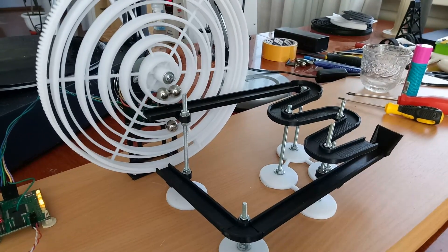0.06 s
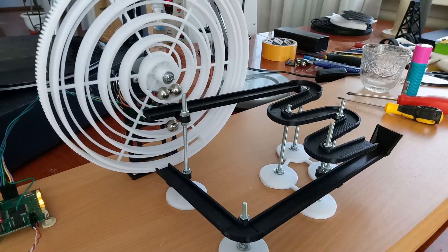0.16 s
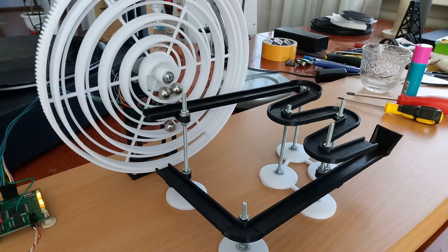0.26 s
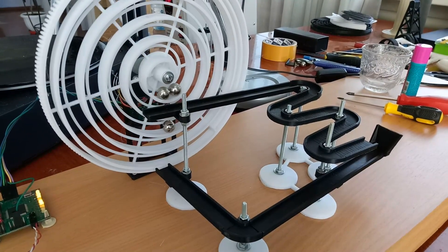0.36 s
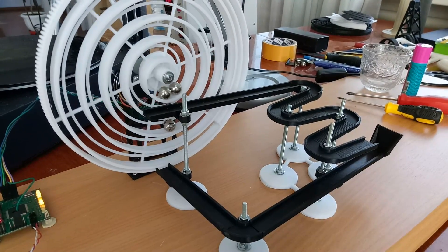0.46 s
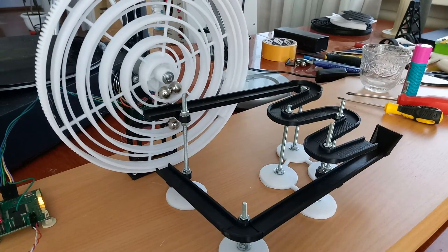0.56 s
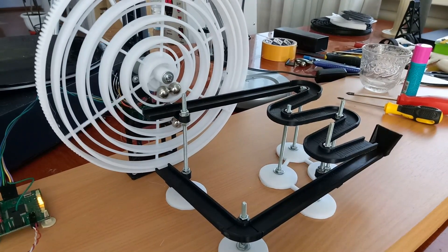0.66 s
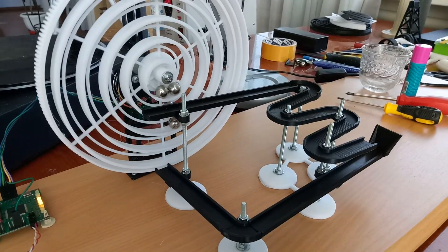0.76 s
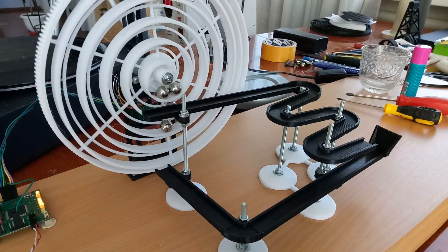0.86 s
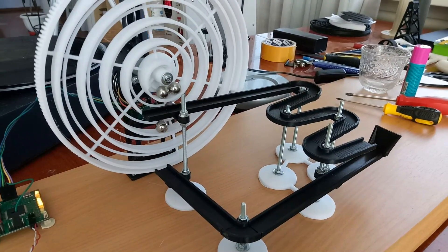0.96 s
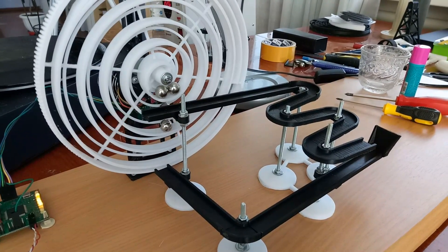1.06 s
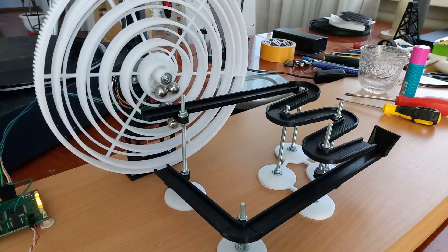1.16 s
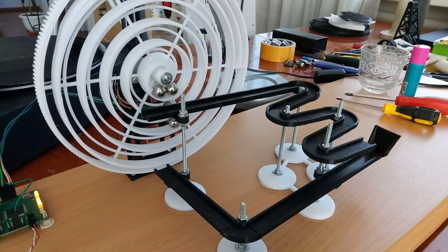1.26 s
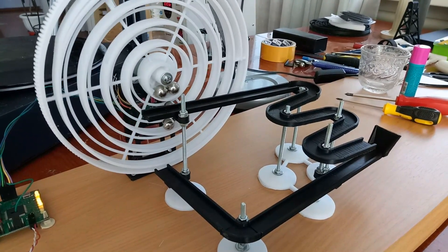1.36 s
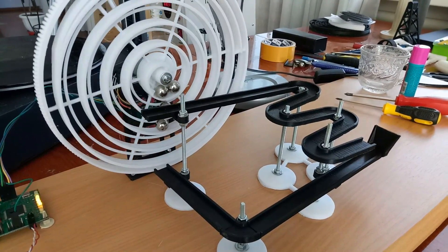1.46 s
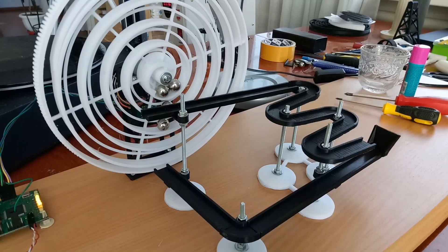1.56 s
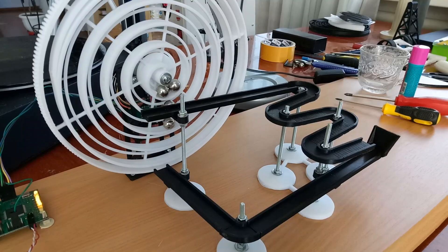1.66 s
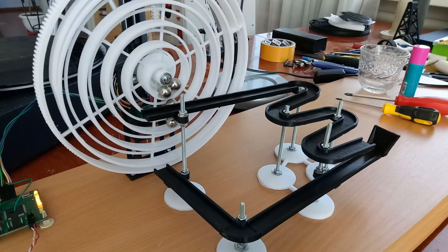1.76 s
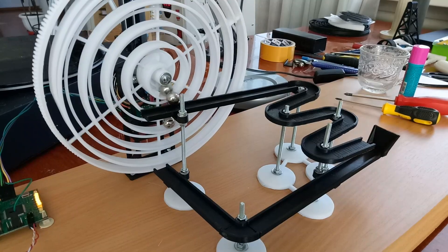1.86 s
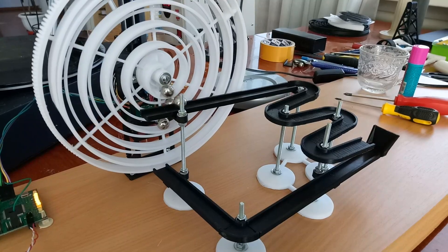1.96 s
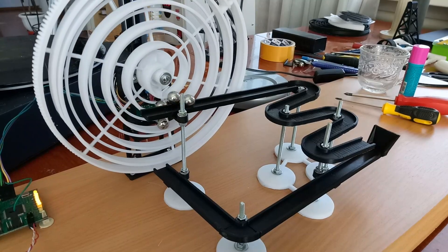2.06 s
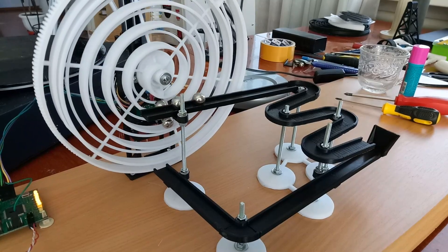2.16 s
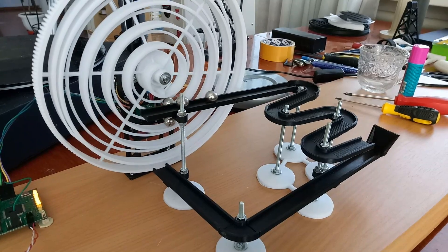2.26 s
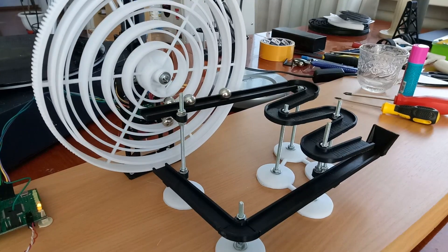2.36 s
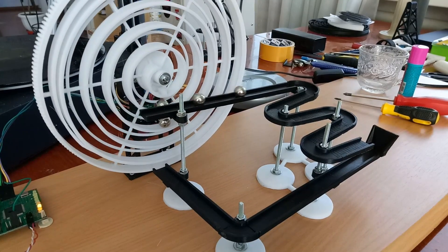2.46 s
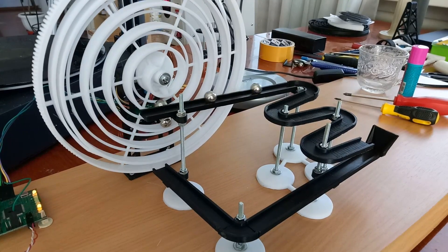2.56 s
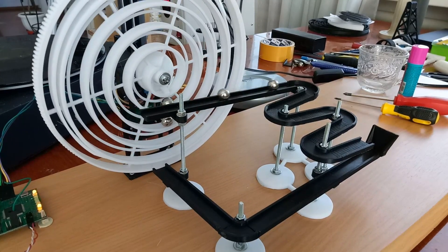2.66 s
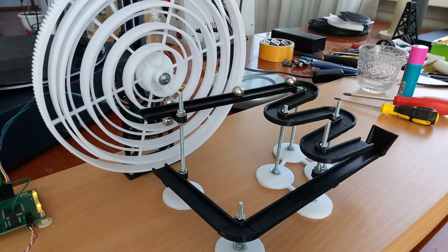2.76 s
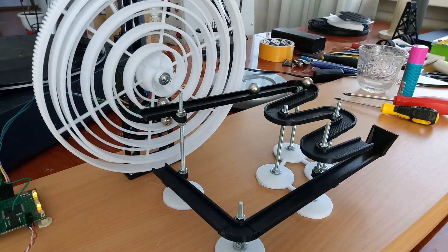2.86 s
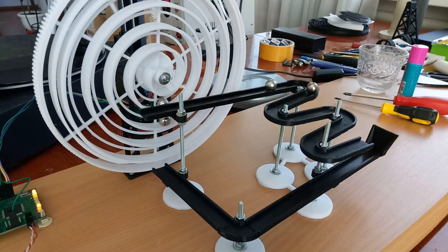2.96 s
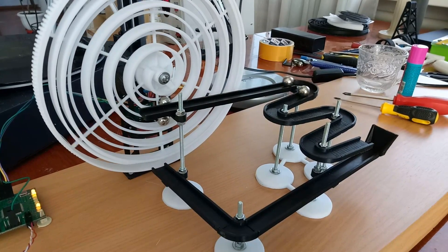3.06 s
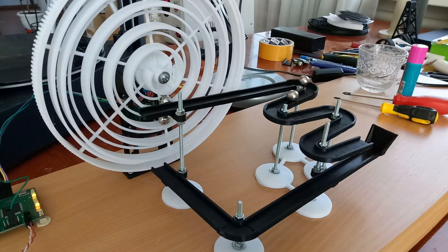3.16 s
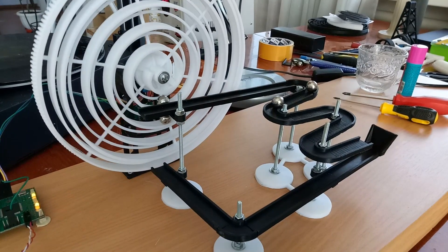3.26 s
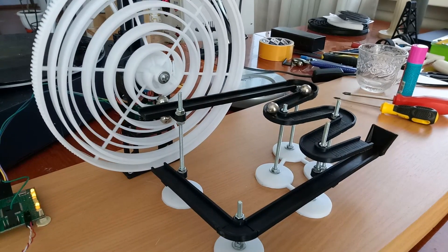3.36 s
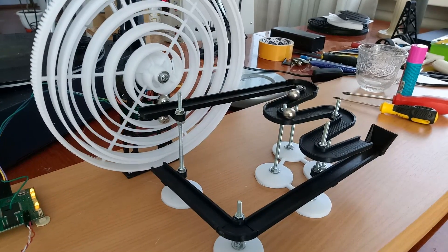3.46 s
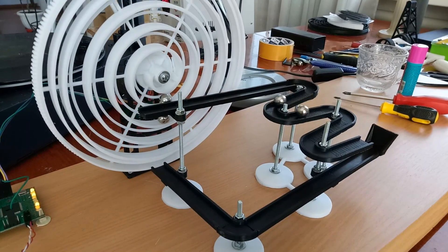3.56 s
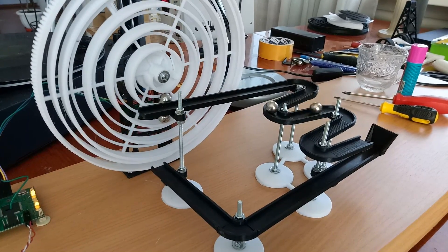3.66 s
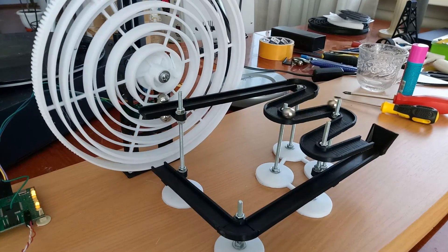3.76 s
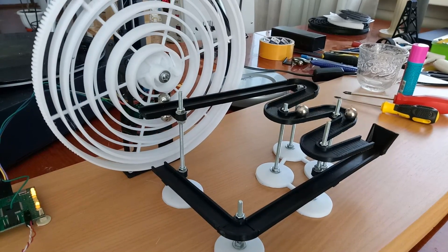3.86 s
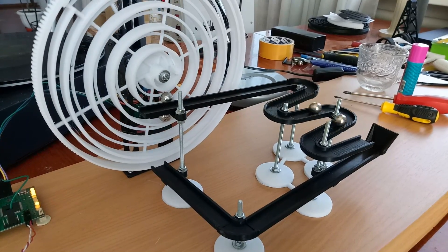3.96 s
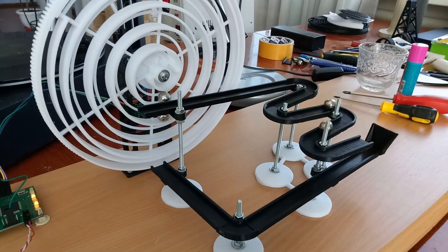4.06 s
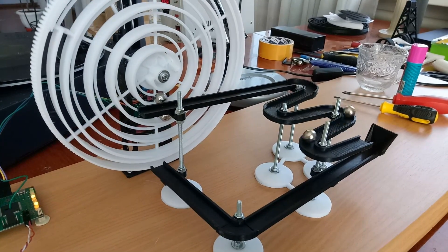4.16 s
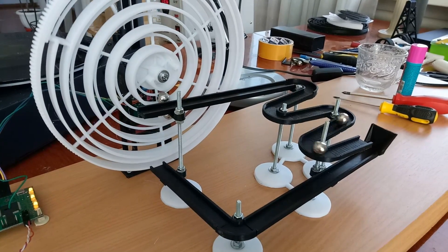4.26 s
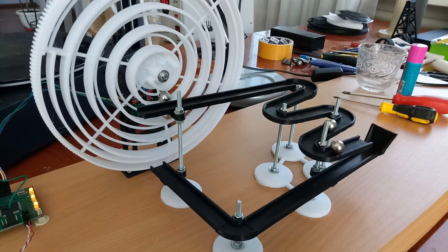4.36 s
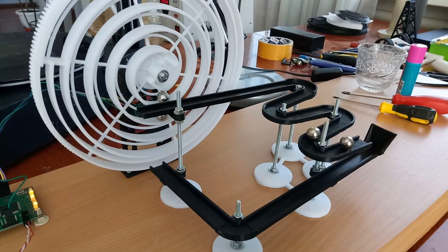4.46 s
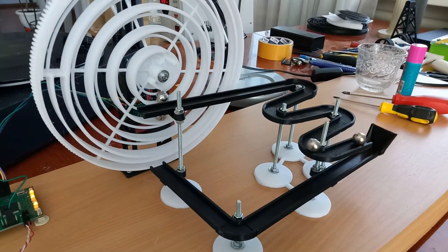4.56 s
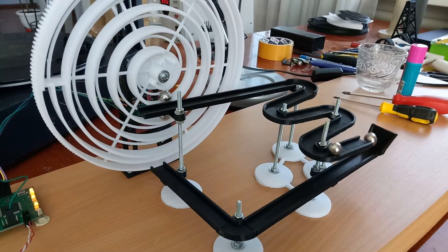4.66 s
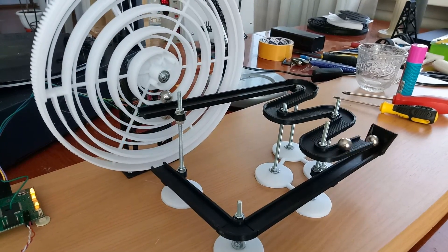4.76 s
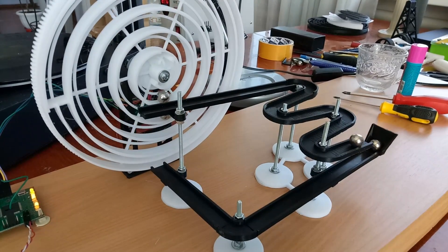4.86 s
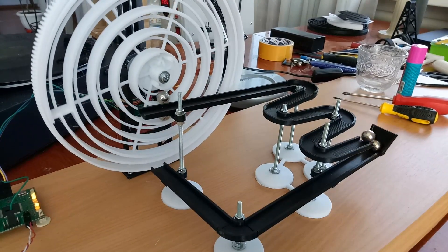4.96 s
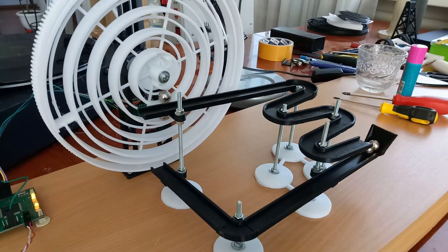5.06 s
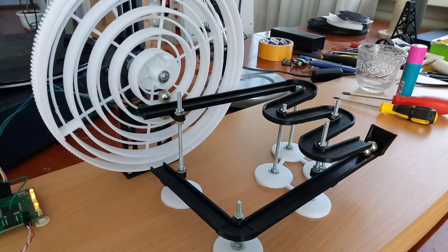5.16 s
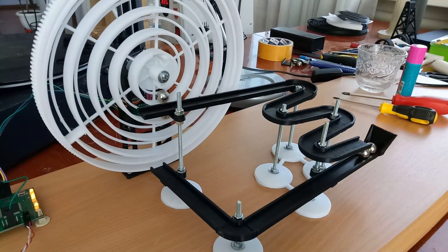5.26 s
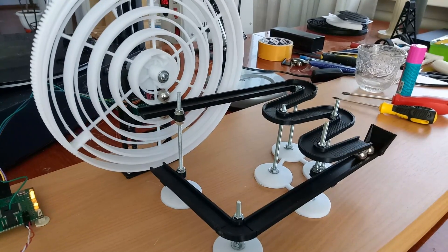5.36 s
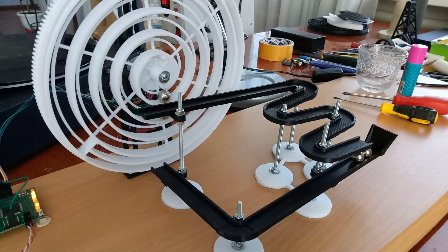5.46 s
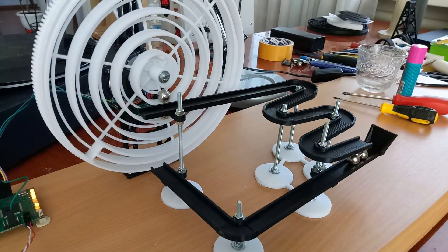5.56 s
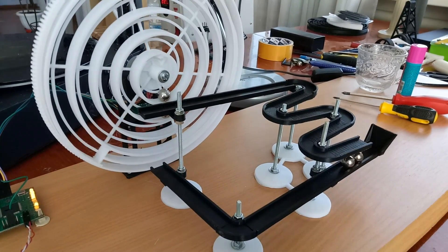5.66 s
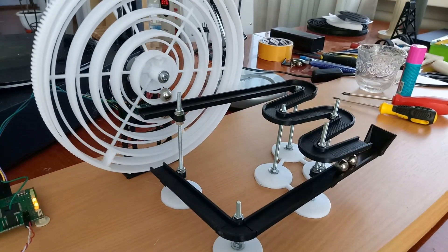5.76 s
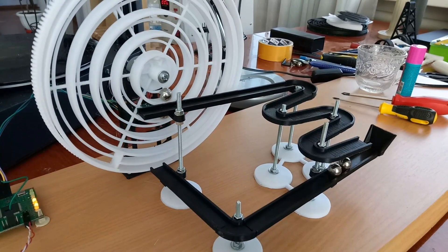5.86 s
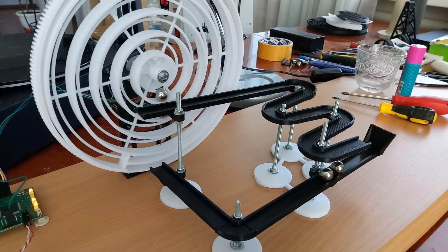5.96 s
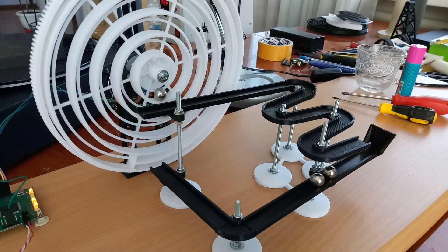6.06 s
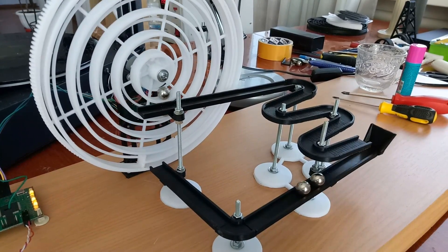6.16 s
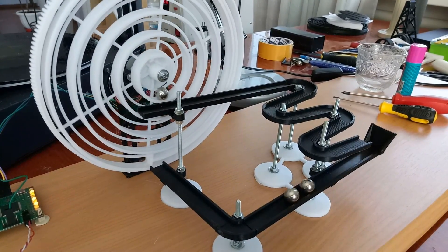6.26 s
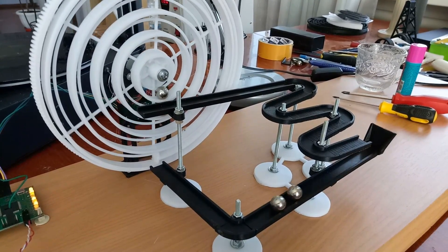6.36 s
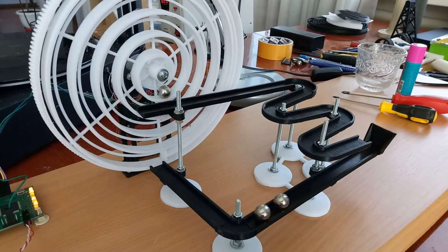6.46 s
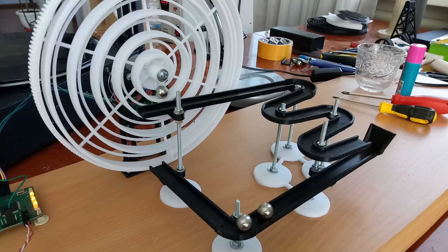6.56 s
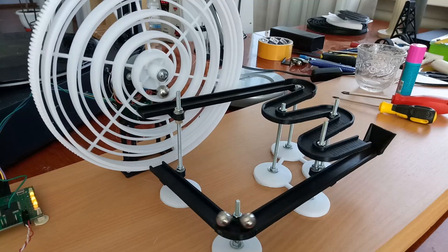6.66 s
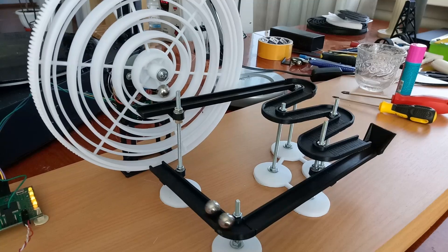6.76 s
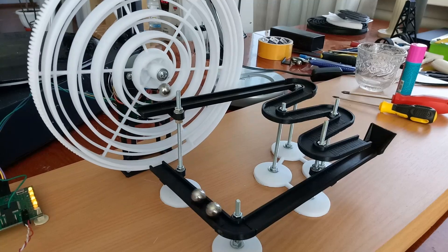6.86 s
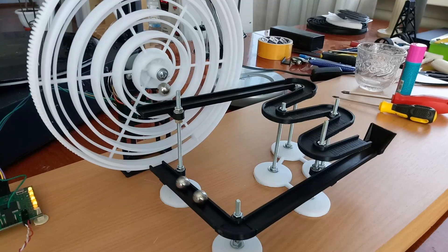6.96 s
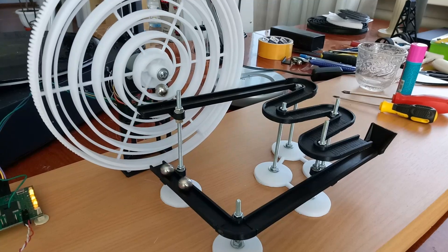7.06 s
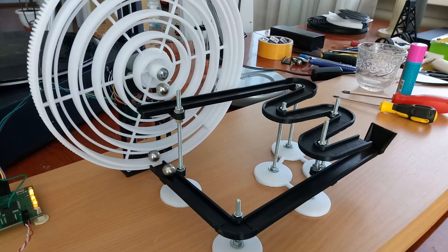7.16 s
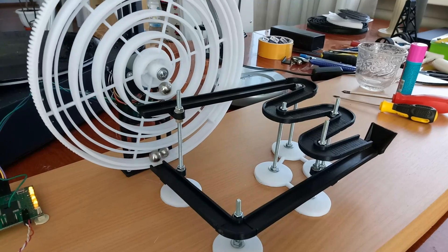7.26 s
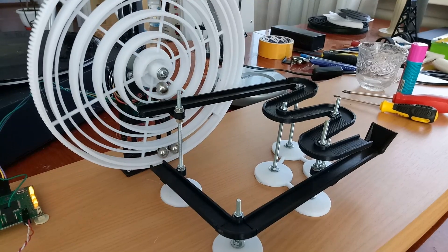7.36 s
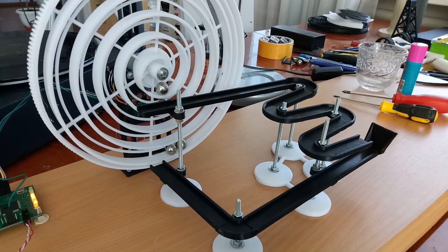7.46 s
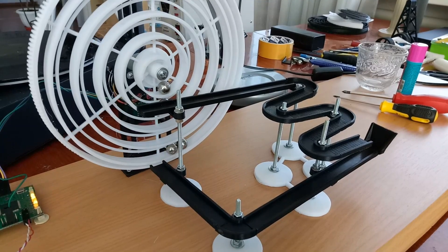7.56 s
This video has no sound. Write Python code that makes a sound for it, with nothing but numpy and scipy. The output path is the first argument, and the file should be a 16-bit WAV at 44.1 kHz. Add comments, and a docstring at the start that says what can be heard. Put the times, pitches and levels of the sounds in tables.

```python
"""A gear rubs, knocks and squeaks over a motor's whine and hiss: a small marble machine on a desk.
Its wheel lifts two steel balls and tips them onto a plastic zigzag track. They bounce, rattle down the bends,
drop one after the other into a cup, and roll down a long ramp back to the wheel, where they click together.
Blows and rolling are scattered or random force ringing a plastic part, split into four registers from desk
thump to tick; motor and hiss are shaped noise, and a low tone that swells now and then is a wavering sine."""
import sys
import numpy as np
from scipy import signal
from scipy.fft import rfft, irfft, next_fast_len
from scipy.io import wavfile
from scipy.ndimage import uniform_filter1d

SR = 44100
rng = np.random.default_rng(int(sys.argv[2]) if len(sys.argv) > 2 else 0)


def persist_wave(psi):
    """Save psi, clipped to +-1, as 16-bit WAV."""
    counts = np.round(np.clip(psi, -1, 1) * 32767).astype(np.int16)
    wavfile.write(sys.argv[1], SR, np.atleast_2d(counts).T)


N = 335160  # 7.6 s
TIME = np.arange(N) / SR

# In all tables, spectra are: pitch_hz, level_db, and resonances: pitch_hz, width_hz, height_db.
# Blows are: start_s, clack_db, weight_db (extra thump and knock). Rolling is: time_s, clack_db.
# Each surface's level_db offset comes on top of these clack levels.
# Colours have rows for thump, knock and tick: level_db against the clack at usual strength,
# growth (dB gained per dB of clack).

# The four registers of a contact, in the order clack, thump, knock, tick:
# low_hz, high_hz, build_up_s, die_away s (time constants, which blows scale for each surface)
REGISTERS = [(1043, 3170, 0.0078, 0.013), (25, 397, 0.039, 0.12), (473, 763, 0.036, 0.012),
             (2590, 17000, 0.000065, 0.0087)]


def upper_track():
    """The balls land on the upper track and bounce, then roll along it and bump its walls."""
    # Plastic of the upper track: pitch_hz, level_db; then pitch_hz, width_hz, height_db
    spectrum = [(40, -28), (110, -8.5), (420, -11.5), (600, -4.5), (1200, 4.5), (2000, -3), (3200, -24),
                (4800, -9), (6200, -13), (8000, -64.5), (10500, -54.5), (15000, -37), (16500, -67.5)]
    modes = [(129, 28, 7.1), (190.2, 18, 9), (321, 24, 14.4), (539, 99, 14.6), (651, 53, 11),
             (794, 120, 11), (1013.6, 40, 13.6), (1094, 83, 8.6), (1243, 93, 7), (1333, 22, 8.1),
             (1775, 220, 10), (2290, 530, 3.8), (2750, 170, 7.9), (3520, 200, 9.7), (3830, 180, 10.8),
             (5300, 300, 2.9)]
    # Landings and bounces, then bumps against the walls: start_s, clack_db, weight_db
    landings = [(1.9738, -33.5, -3.5), (2.0005, -43.5, 8.5), (2.0288, -28.5, 1), (2.0762, -37, -2),
                (2.168, -33.5, 3), (2.2005, -41, 1), (2.2222, -30, -4.5), (2.254, -42, -1.5),
                (2.2745, -38, -5.5)]
    wall_bumps = [(2.8965, -39.5, 4.5), (2.9265, -35, 3.5), (2.944, -39.5, 2.5), (3.209, -41, 9),
                  (3.2413, -36.5, 5.5), (3.256, -38.5, 1.5), (3.3236, -43, -2), (3.405, -42.5, 3.5),
                  (3.4304, -47.5, -4.5), (3.6384, -40, -4), (3.656, -36, -1), (3.675, -39.5, -4.5),
                  (3.8835, -40, -5), (3.9068, -40, -2)]
    # Rolling, which follows the balls' speed: time_s, clack_db
    rolling = [(2.1, -46), (2.146, -60), (2.176, -50), (2.398, -52.5), (2.594, -55), (3.088, -47.5),
               (3.65, -44), (3.764, -45.5), (3.95, -42)]
    # Colours of landing, bump and rolling: level_db, growth
    landing_colour = [(-15, 0.5), (-6.5, 0.54), (-11.5, 1.18)]
    bump_colour = [(-6.5, 0.65), (-5, 0.66), (-19.5, 1)]
    roll_colour = [(-11.5, 1.4), (-8.5, 0.96), (-25.5, 1.65)]

    track = ring(spectrum, modes)
    out = blows(landings, track, landing_colour, level_db=-1.94, linger=0.54, soft=0.83,
                alike=0.4, tail_db=-14.5, tail_t60=0.24)
    out += blows(wall_bumps, track, bump_colour, level_db=-3.5, linger=0.62, soft=0.34,
                 alike=0.37, tail_db=-15, tail_t60=0.25)
    out += roll(rolling, track, roll_colour, level_db=0.43, bumps_per_s=300, spread_db=1.0,
                smooth=0.83, contact_hz=6160, scatter_t60=0.031)
    return out


def lower_bends():
    """In the tight lower bends the rolling balls rock from rail to rail, tapping the plastic."""
    # Plastic of the bends: pitch_hz, level_db; then pitch_hz, width_hz, height_db
    spectrum = [(40, -32), (115, -7), (420, -16), (600, -5.5), (900, -8), (1200, -1.5), (1900, -0.5),
                (3200, -29), (4800, -9.5), (6200, -15), (8000, -94.5), (15000, -57), (16500, -78)]
    modes = [(182, 5.9, 2.6), (331.6, 41, 6.2), (557, 7.7, 3.1), (645.5, 15, 9), (781, 123, 12),
             (1019, 71, 11), (1160, 12, 5), (1247, 110, 9.8), (1780, 98, 4.3), (2744, 150, 11),
             (3460, 190, 11), (3830, 330, 12.7), (5130, 450, 3.3)]
    # Taps on the rails: start_s, clack_db, weight_db
    rail_taps = [(4.041, -42, -10), (4.0629, -40.5, 7), (4.108, -46.5, 6), (4.1547, -41, -11),
                 (4.1951, -34.5, 3.5), (4.2196, -36.5, 1.5), (4.25, -42, 8), (4.2794, -43.5, -2),
                 (4.3174, -43, 7), (4.479, -45, 6), (4.5628, -40.5, -2), (4.5848, -44.5, -0.5),
                 (4.6082, -35, -7.5), (4.6262, -37, 5.5), (4.7, -43, -4)]
    # Rolling: time_s, clack_db
    rolling = [(3.98, -43), (4.186, -42), (4.44, -45), (4.626, -40), (4.79, -46), (5.06, -43),
               (5.12, -58.5)]
    # Colours of tap and rolling: level_db, growth
    tap_colour = [(-10.5, 0.51), (-1, 0.65), (-17.5, 1)]
    roll_colour = [(-11.5, 1), (-1, 0.91), (-22.5, 0.99)]

    bends = ring(spectrum, modes)
    out = blows(rail_taps, bends, tap_colour, level_db=-6.5, linger=0.56, soft=0.63,
                alike=0.3, tail_db=-23.5, tail_t60=0.34)
    out += roll(rolling, bends, roll_colour, level_db=-2.0, bumps_per_s=320, spread_db=1.5,
                smooth=0.45, contact_hz=6000, scatter_t60=0.055)
    return out


def cup_drops():
    """Each ball drops into the cup, glances off its walls and rebounds unevenly, ringing the plastic."""
    # Plastic of the cup: pitch_hz, level_db; then pitch_hz, width_hz, height_db
    spectrum = [(40, -26), (120, -2), (250, -22.5), (430, -13), (600, 0), (800, -3.5), (950, -1.5),
                (1950, 0), (2250, -14), (4800, -14), (6300, -8.5), (8000, -48.5), (10300, -41.5),
                (15000, -25.5), (16500, -60)]
    modes = [(185, 18, 13), (310, 13, 7.5), (640, 19, 9.8), (768, 210, 18), (838, 23, 5.4), (994, 13, 9.7),
             (1110, 24, 7), (1227, 88, 10.3), (1369, 45, 12), (1900, 350, 6.1), (1820, 180, 3.6),
             (2120, 150, 4.1), (2395, 46, 12), (2840, 220, 13.5), (3895, 280, 13.3), (4700, 320, 19.5),
             (5480, 430, 15.4)]
    # Drops, glances and rebounds: start_s, clack_db, weight_db
    hits = [(4.8218, -23, 6.5), (4.8298, -23.5, -13), (4.852, -52, -10), (4.9108, -31.5, -10),
            (4.9162, -31, 8), (4.958, -38.5, -6), (4.9834, -37.5, 5.5), (4.989, -43, 12),
            (5.0308, -47.5, -7), (5.1505, -25.5, 5), (5.157, -29.5, 3.5), (5.1665, -32.5, -7),
            (5.186, -41, 1.5), (5.2079, -31.5, -7), (5.216, -38.5, 3.5), (5.233, -41.5, -4),
            (5.2468, -41.5, 3.5), (5.271, -50, -2)]
    # Colour of the blows: level_db, growth
    colour = [(-17.5, 0.67), (-3, 0.76), (-12, 1)]
    return blows(hits, ring(spectrum, modes), colour, level_db=-2.5, linger=0.38, soft=0.79,
                 alike=0.2, tail_db=-28.5, tail_t60=0.33)


def return_ramp():
    """The balls roll down two ramp legs of different resonances; joints and the corner jolt them."""
    # Plastic of the whole ramp: pitch_hz, level_db; then pitch_hz, width_hz, height_db
    spectrum = [(40, -32.5), (110, -11.5), (420, -13), (600, -4), (900, -2.5), (1200, -1), (2000, -2.5),
                (3200, -36.5), (4800, -29), (6200, -34.5), (8000, -80), (15000, -69), (16500, -82.5)]
    shared_modes = [(190.7, 26, 14.5), (301.6, 16, 9.5), (547, 26, 7.5), (1013, 40, 11), (1378, 26, 5.5)]
    # Resonances that each leg adds: pitch_hz, width_hz, height_db
    first_modes = [(640, 50, 3.8), (770, 190, 12.4), (1220, 85, 10.8), (1820, 130, 2.5), (2050, 300, 7.2),
                   (2800, 360, 17), (3700, 280, 14), (3960, 260, 18.3), (4730, 310, 12.7), (5540, 600, 7.5)]
    second_modes = [(681, 84, 8.9), (1145, 160, 3.5), (2210, 290, 4.9), (2830, 360, 17.9), (3530, 360, 15),
                    (3910, 400, 19), (4770, 600, 21), (5160, 800, 12), (5580, 500, 12)]
    # Rolling on each leg: time_s, clack_db
    first_roll = [(5.22, -46.5), (5.4, -68.5), (5.58, -83.5), (5.7, -73), (5.92, -67), (6.05, -58.5),
                  (6.2, -53), (6.38, -49), (6.52, -49), (6.66, -47.5)]
    second_roll = [(6.71, -57.5), (6.922, -50), (7.1, -52.5), (7.21, -48), (7.32, -50)]
    # Jolts: start_s, clack_db, weight_db
    jolts = [(5.725, -63, -8), (5.8711, -60, -4), (6.177, -55.5, 13), (6.369, -43, -4), (6.5785, -46, 6),
             (6.7057, -40, 6.5), (6.7282, -38, -5), (6.8205, -44, 10.5), (6.865, -44.5, 8),
             (7.035, -42, -4)]
    # Colours of rolling and jolt: level_db, growth
    roll_colour = [(-8.5, 0.57), (2, 0.44), (-22, 1.4)]
    jolt_colour = [(-11, 1), (0.5, 0.51), (-19.5, 0.9)]

    first_leg = ring(spectrum, [*shared_modes, *first_modes])
    second_leg = ring(spectrum, [*shared_modes, *second_modes])
    # all the jolts ring with the colour of the second leg
    out = blows(jolts, second_leg, jolt_colour, level_db=-5.5, linger=0.72, soft=0.76,
                alike=0.42, tail_db=-13, tail_t60=0.3)
    for rolling, leg in (first_roll, first_leg), (second_roll, second_leg):
        out += roll(rolling, leg, roll_colour, level_db=1.0, bumps_per_s=320, spread_db=-1.35,
                    smooth=0.63, contact_hz=5800, scatter_t60=0.03)
    return out


def balls_at_wheel(wheel):
    """The balls roll into the wheel and click against each other and its plastic."""
    # Clicks: start_s, clack_db, weight_db
    clicks = [(7.3111, -52.5, -1), (7.3494, -51, -1), (7.3705, -62, -2), (7.4166, -48.5, 3.5),
              (7.4645, -50.5, -13), (7.49, -54.5, 3), (7.508, -60.5, 7)]
    # Rolling: time_s, clack_db
    rolling = [(7.32, -60.5), (7.38, -50), (7.405, -59.5), (7.44, -52.5), (7.53, -54), (7.6, -60)]
    # Colours of click and rolling: level_db, growth
    click_colour = [(2.1, 0.39), (6.9, 0.81), (2.8, 0.84)]
    roll_colour = [(5, 0.58), (8.5, 1), (-8, 1)]

    out = blows(clicks, wheel, click_colour, level_db=-5.0, linger=0.36, soft=0.88,
                alike=0.84, tail_db=-21.0, tail_t60=0.16)
    out += roll(rolling, wheel, roll_colour, level_db=0.0, bumps_per_s=260, spread_db=0.0,
                smooth=0.7, contact_hz=6400, scatter_t60=0.076)
    return out


def gear(wheel):
    """The gear rubs lightly all the time, harder in spells, and knocks the wheel and squeaks when it catches."""
    # Spells of harder rubbing: start_s, length_s, clack_db
    rubs = [(0, 0.05, -68), (0.017, 0.19, -67), (0.228, 0.11, -74), (0.413, 0.28, -73), (0.793, 0.26, -78),
            (1.128, 0.12, -75.5), (1.34, 0.054, -76), (1.47, 0.14, -74.5), (1.62, 0.098, -75),
            (1.777, 0.054, -76)]
    # Catches: start_s, clack_db, weight_db
    knocks = [(0.07, -62, 0.5), (0.0818, -60, -2), (0.5171, -56, 0.5), (0.548, -70, 0), (0.814, -68, -1),
              (0.865, -73.5, 6), (0.888, -73, 6), (0.917, -81, 8), (1.13, -77, 6), (1.158, -74.5, 6),
              (1.372, -75, 2.5), (1.4835, -63, -5.5), (1.52, -62.5, -3.5), (1.552, -76, 6),
              (1.648, -70, -7), (1.7768, -65, -4), (1.8, -73, 1.5)]
    # Thin squeaks: start_s, length_s, pitch_hz, level_db
    squeak_rows = [(0.057, 0.044, 1930, -62.5), (0.07, 0.043, 4600, -77), (0.53, 0.076, 4570, -80),
                   (1.465, 0.07, 5400, -73)]
    # Colours of rub and knock: level_db, growth
    rub_colour = [(12.5, 0.46), (10.5, 1), (-9.5, 0.96)]
    knock_colour = [(-5.5, 0.33), (11.5, 1), (-9.5, 0.81)]

    idle_db = -83  # light rubbing between the spells, before the level offset
    pressure = amp(idle_db) + swells((s, length, amp(db)) for s, length, db in rubs)
    rubbing = np.column_stack([TIME, 20 * np.log10(pressure)])
    out = roll(rubbing, wheel, rub_colour, level_db=-7.0, bumps_per_s=260, spread_db=-2.0,
               smooth=0.41, contact_hz=6700, scatter_t60=0.16)
    out += blows(knocks, wheel, knock_colour, level_db=-6.0, linger=0.5, soft=1.5,
                 alike=0.49, tail_db=-15, tail_t60=0.12)
    for s, length, hz, db in squeak_rows:
        out += swells([(s, length, amp(db))]) * whine(hz, width=420)
    return out


def wheel_body():
    """The plastic wheel's response, which the balls and the gear both ring."""
    # Plastic of the wheel: pitch_hz, level_db; then pitch_hz, width_hz, height_db
    spectrum = [(40, -12), (70, -1.5), (120, 1.5), (420, -11), (600, -23), (1200, -7.5), (2000, -11),
                (3200, -30), (3900, -16), (4800, -10.5), (6200, -16.5), (8000, -69), (10500, -43),
                (13000, -52.5), (15000, -33), (16500, -59)]
    modes = [(189, 29, 13), (308, 24, 12.5), (583, 56, 20.5), (632, 16, 7.5), (665, 110, 23), (790, 60, 13),
             (1022, 40, 9.5), (1210, 140, 18.5), (1390, 36, 11), (1790, 57, 8), (1910, 61, 9.5),
             (2060, 96, 5.5), (2420, 210, 7), (2800, 240, 11), (3600, 180, 9.5), (4630, 130, 0),
             (5550, 240, 5.5)]
    return ring(spectrum, modes)


def low_tone():
    """A slightly wavering sine near 315 Hz: early moans of the wheel, then two swells as the balls roll the track."""
    # Five early moans, then two swells during the upper track: start_s, length_s, level_db
    tone_swells = [(0.053, 0.19, -67.5), (0.788, 0.1, -73.5), (0.985, 0.097, -65), (1.09, 0.16, -69),
                   (1.646, 0.099, -70), (2.32, 0.28, -63), (2.78, 0.25, -56.5)]

    tone_hz, waver_hz, waver_rate_hz = 315.3, 2.96, 8
    waver = unit(shaped(rng.standard_normal(N), lambda hz: 1 / (1 + (hz / waver_rate_hz) ** 2)))
    phase = 2 * np.pi * np.cumsum(tone_hz + waver_hz * waver) / SR
    note = np.sqrt(2) * np.sin(phase)  # rms 1
    return swells((s, length, amp(db)) for s, length, db in tone_swells) * note


def motor():
    """The drive motor whines steadily on a few narrow bands of noise."""
    # Motor whine: pitch_hz, width_hz, level_db
    whines = [(607, 20, -79), (645, 30, -79), (1178, 12, -80.5)]
    return sum(amp(db) * whine(hz, width) for hz, width, db in whines)


def hiss():
    """Room and microphone noise: steady random hiss shaped by a fixed spectrum."""
    # Relative spectrum: pitch_hz, level_db (per Hz)
    spectrum = [(25, 14), (100, 15), (400, 9), (1000, 6), (2000, 1), (5500, 1.5), (7000, -7), (8200, -20),
                (12200, -15.5), (13500, -29.5), (14400, -15), (15000, 3.5), (15700, -21.5)]
    level_db = -75.5
    return amp(level_db) * unit(shaped(rng.standard_normal(N), lambda hz: amp(read(spectrum, hz))))


def blows(rows, body, colour, level_db, linger, soft, alike, tail_db, tail_t60):
    """Each blow scatters through the frame: the tick comes at once, the desk answers last, a faint tail hangs on.

    linger and soft scale the die-away and build-up; alike is the share of scatter that blows have in common;
    the tail starts at tail_db and falls 60 dB in tail_t60 seconds."""
    t, out = np.arange(SR // 4) / SR, np.zeros(N)
    usual_path = rng.choice([-1., 1.], len(t))  # blows on one part land near one another and ring alike
    tail = amp(tail_db - 60 * t / tail_t60)
    times, clack_db, weight_db = np.transpose(rows)
    # weight goes to thump and knock only
    levels_db = register_levels(clack_db, colour) + np.outer([0, 1, 1, 0], weight_db)
    for s, blow_db in zip(times, levels_db.T):
        own_path = rng.choice([-1., 1.], len(t))
        scatter = np.where(rng.random(len(t)) < alike, usual_path, own_path)
        for (lo, hi, rise, fall), db in zip(REGISTERS, blow_db):
            swell = (1 - np.exp(-t / (rise * soft))) * (np.exp(-t / (fall * linger)) + tail)
            rung = signal.fftconvolve(scatter * swell, body)[:len(t)]
            # the energy of rms 1 held for 20 ms
            sound = unit(register(rung, lo, hi)) * np.sqrt(0.02 / t[-1])
            add(out, s, amp(level_db + db) * sound)
    return out


def roll(rows, body, colour, level_db, bumps_per_s, spread_db, smooth, contact_hz, scatter_t60):
    """A steady grind plus tiny jolts from ridges in the plastic; the soft contact leaves out the top treble.

    smooth is the grind's level against the jolts; scatter_t60 is in seconds."""
    # A ball leans on the side wall and the hollow knock swells: start_s, length_s, height_db
    leans = [(2.933, 0.55, 3), (4.05, 0.5, 6), (4.498, 0.26, 7), (5.63, 0.19, 5), (6.15, 0.25, 8),
             (6.637, 0.21, 8.5)]
    # A ball scuffs along the wall and rattles: start_s, length_s, extra_clack_db, extra_tick_db
    scuffs = [(2.61, 0.11, 5, 11), (2.746, 0.34, 2.5, 8), (2.95, 0.063, 1, 5), (3.31, 0.095, 2.5, 4),
              (3.735, 0.038, 5, 9), (4.679, 0.052, -2, 13), (5.369, 0.046, 8.5, 12), (5.716, 0.041, 8.5, 3),
              (5.793, 0.15, 0.5, -3), (6.352, 0.15, 2, 3), (6.557, 0.085, 1, 12.5), (6.695, 0.11, 4.5, 11),
              (6.811, 0.076, 7, 11), (7.018, 0.18, 4.5, 11.5)]
    lean_thump = 0.12  # share of the lean's swell, in dB, that reaches the desk
    # Hard jolts are brighter: the tick grows as a power of the jolt and rings for its own time
    tick_power, tick_grind, tick_t60_s = 2, 0.41, 0.016
    flare_rms_db, flare_hz = 1, 22  # the treble flickers
    roll_in_s, roll_out_s = 0.025, 0.14  # the balls enter and leave a stretch

    def answer(force, t60):
        """The plastic's answer to a contact force softened at the top."""
        force = shaped(force, lambda hz: 1 / (1 + (hz / contact_hz) ** 20))
        return signal.oaconvolve(travel(force, t60), body)[:N]

    s, clack_db = np.transpose(rows)
    ridge_met = rng.random(N) < bumps_per_s / SR
    jolts = ridge_met * amp(spread_db * np.minimum(rng.exponential(1, N), 3.5))
    grind = rng.standard_normal(N)
    rumble = answer(unit(jolts) + smooth * grind, scatter_t60)
    rattle = answer(unit(jolts ** tick_power) + tick_grind * grind, tick_t60_s)

    lean_db = swells(leans)
    chatter_db = swells((start, length, db) for start, length, db, _ in scuffs)
    scrape_db = swells((start, length, db) for start, length, _, db in scuffs)
    flicker = shaped(rng.standard_normal(N), lambda hz: 1 / (1 + (hz / flare_hz) ** 2))
    flare_db = flare_rms_db * unit(flicker)
    # clack, thump, knock, tick
    drives = [(rumble, chatter_db), (rumble, lean_thump * lean_db),
              (rumble, lean_db), (rattle, scrape_db + flare_db)]

    out = np.zeros(N)
    levels_db = register_levels(clack_db, colour)
    for (lo, hi, _, _), db, (sound, swell_db) in zip(REGISTERS, levels_db, drives):
        part = register(sound, lo, hi)
        # evened out over 0.1 s, so that the ball's motion sets the swells
        part = part / np.sqrt(uniform_filter1d(part ** 2, size=SR // 10) + 1e-30)
        out += part * amp(np.interp(TIME, s, db) + swell_db + level_db)
    return out * np.interp(TIME, [s[0] - roll_in_s, s[0], s[-1], s[-1] + roll_out_s], [0, 1, 1, 0])


def travel(force, t60, size=8192):
    """As a ball moves on, each stretch of plastic answers with its own fine resonances; the broad colour stays."""
    t, out = np.arange(SR // 12) / SR, np.zeros(N + size)
    force, window = np.pad(force, (size // 2, size)), signal.windows.cosine(size)
    for start in range(0, N + size // 2, size // 2):
        decay = rng.choice([-1., 1.], len(t)) * amp(-60 * t / t60)
        scatter = rfft(np.pad(decay, (size // 64, 0)), size // 2)
        # flatten the broad spectrum, keep the fine peaks
        path = irfft(scatter / np.sqrt(uniform_filter1d(abs(scatter) ** 2, size=14) + 1e-12))
        add(out, start / SR, signal.fftconvolve(force[start:start + size] * window, path))
    return out[size // 2:][:N]


def ring(spectrum, modes, size=8192):
    """Causal (minimum-phase) impulse response of a plastic part: resonances standing on a broad spectrum."""
    hz = abs(np.fft.fftfreq(size, 1 / SR))
    peaks_db = sum(height / (1 + (2 * (hz - f) / width) ** 2) for f, width, height in modes)
    log_gain = np.log(amp(read(spectrum, hz) + peaks_db))
    return np.fft.ifft(np.exp(np.conj(signal.hilbert(log_gain)))).real[:size // 2]


def register_levels(clack_db, colour):
    """Levels of clack, thump, knock and tick: each grows with the strength at its own rate."""
    usual = np.mean(clack_db)
    others = [usual + db + growth * (clack_db - usual) for db, growth in colour]
    return np.array([clack_db] + others)


def whine(hz, width):
    """A narrow wavering tone of rms 1, made of noise through one resonance."""
    return unit(shaped(rng.standard_normal(N), lambda f: 1 / (1 + (2 * (f - hz) / width) ** 2)))


def swells(rows):
    """Arches that rise from 0 and fall back, from rows (start_s, length_s, height)."""
    out = np.zeros(N)
    for s, length, height in rows:
        add(out, s, height * np.sin(np.pi * np.arange(0, length, 1 / SR) / length))
    return out


def register(x, lo, hi, order=12):
    """The share of x between two frequencies."""
    return shaped(x, lambda hz: 1 / np.sqrt((1 + (lo / (hz + 1)) ** order) * (1 + (hz / hi) ** order)))


def shaped(x, gain):
    """Filters x by a function of frequency."""
    size = next_fast_len(x.shape[-1] + 2048)
    return irfft(rfft(x, size) * gain(np.fft.rfftfreq(size, 1 / SR)), size)[..., :x.shape[-1]]


def read(points, hz):
    """A spectrum joined by straight lines over log frequency."""
    f, value = np.transpose(points)
    return np.interp(np.log(hz + 1), np.log(f), value)


def amp(db):
    """Decibels to gain."""
    return 10 ** (np.asarray(db) / 20)


def unit(x):
    """Scales each row to rms 1."""
    return x / np.sqrt(np.mean(x ** 2, axis=-1, keepdims=True) + 1e-30)


def add(mix, s, sound):
    """Mixes a sound in at time s."""
    part = mix[max(round(s * SR), 0):][:len(sound)]
    part += sound[:len(part)]


def scene():
    """Upper track, lower bends, cup, return ramp and wheel, heard from close by."""
    wheel = wheel_body()
    balls = upper_track() + lower_bends() + cup_drops() + return_ramp() + balls_at_wheel(wheel)
    mix = balls + gear(wheel) + low_tone() + motor() + hiss()
    return mix[None]


def record(dry):
    """The recorder's band limit: a steep linear-phase low-pass."""
    edge_hz = 16000
    low_pass = signal.firwin(511, edge_hz, window=("kaiser", 9), fs=SR)
    return signal.oaconvolve(dry, low_pass[None], "same")


dry = scene()
out = record(dry)
persist_wave(out)
```